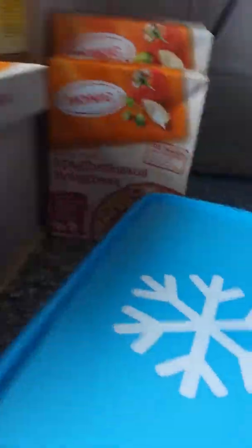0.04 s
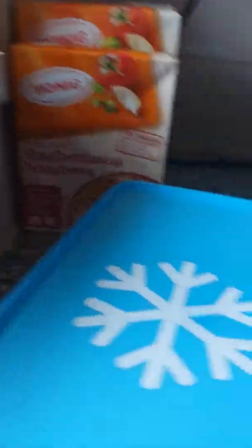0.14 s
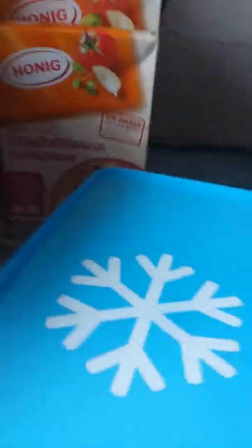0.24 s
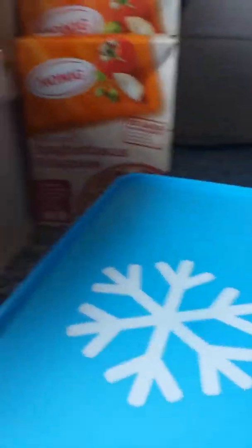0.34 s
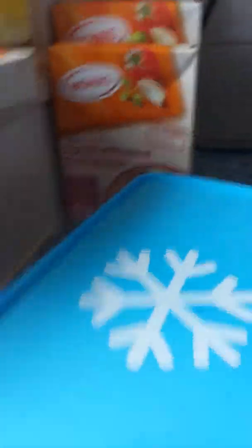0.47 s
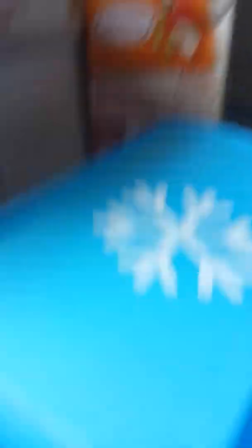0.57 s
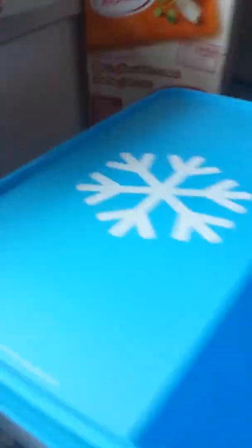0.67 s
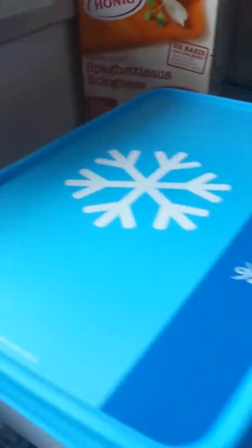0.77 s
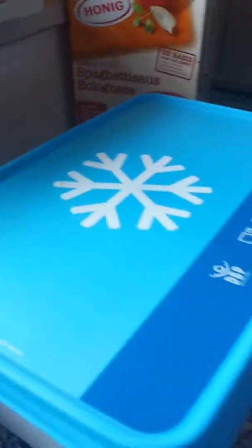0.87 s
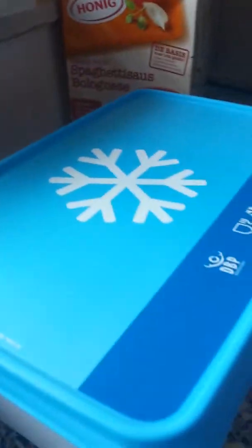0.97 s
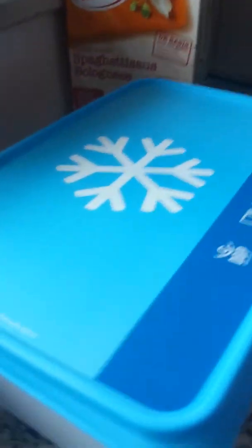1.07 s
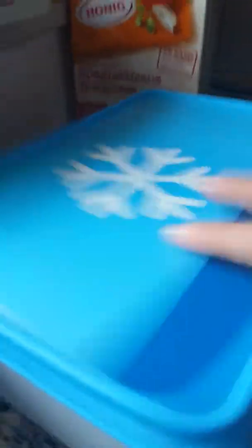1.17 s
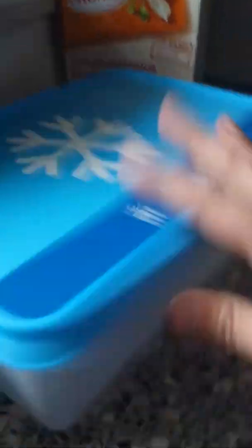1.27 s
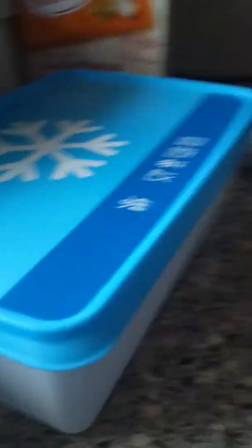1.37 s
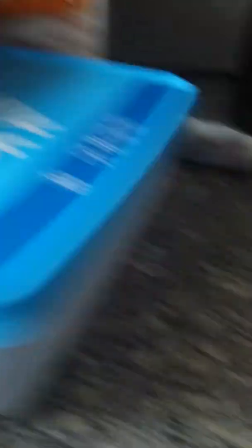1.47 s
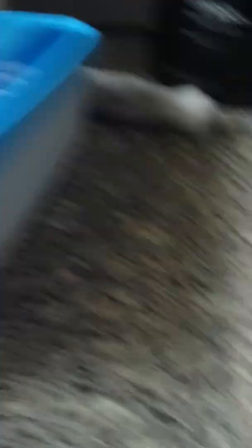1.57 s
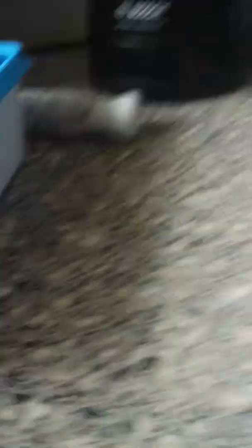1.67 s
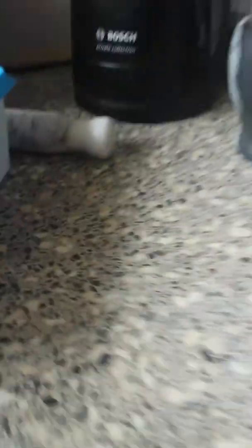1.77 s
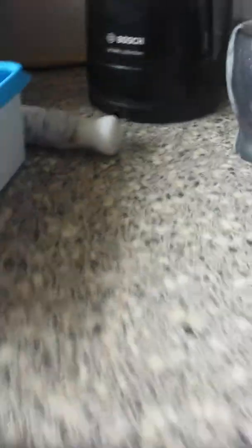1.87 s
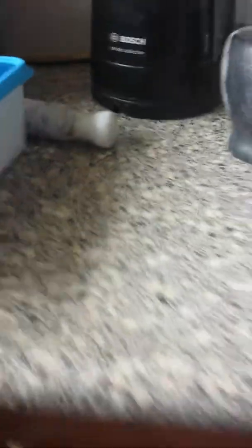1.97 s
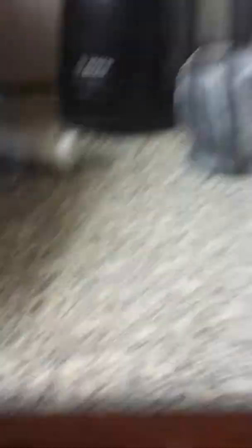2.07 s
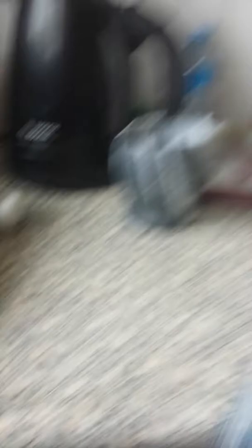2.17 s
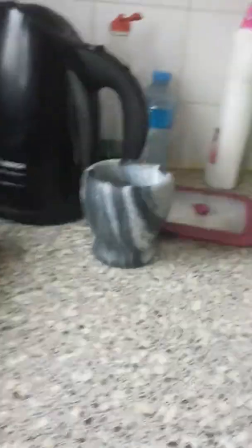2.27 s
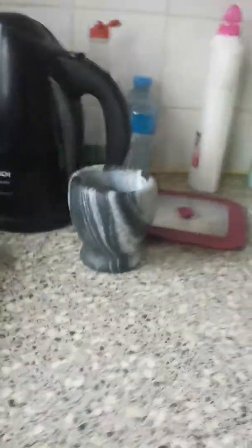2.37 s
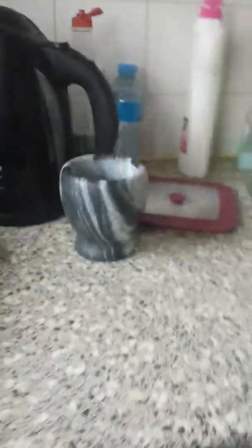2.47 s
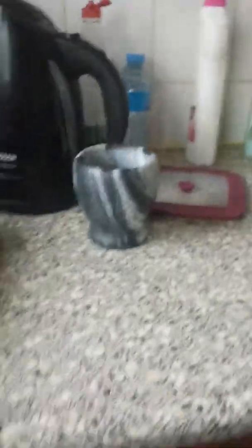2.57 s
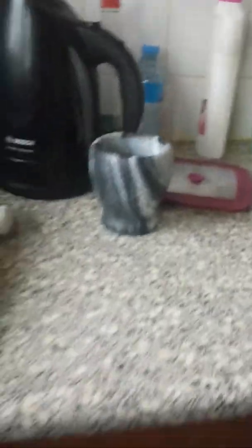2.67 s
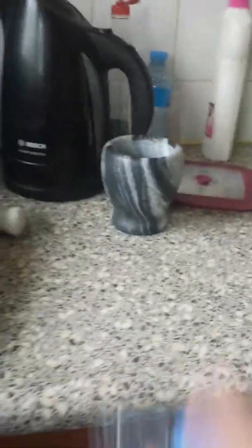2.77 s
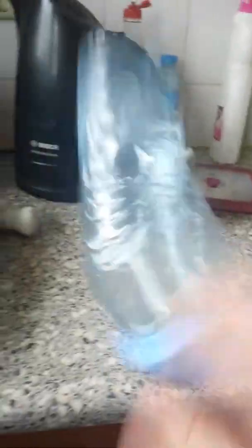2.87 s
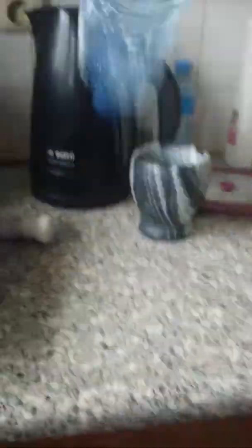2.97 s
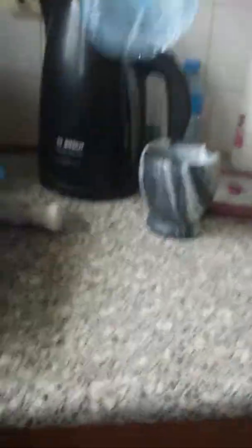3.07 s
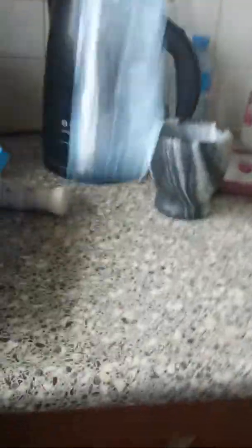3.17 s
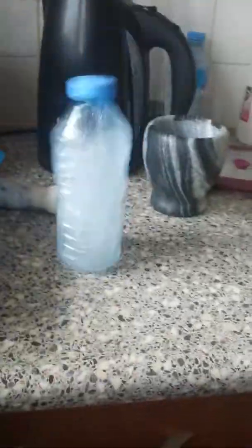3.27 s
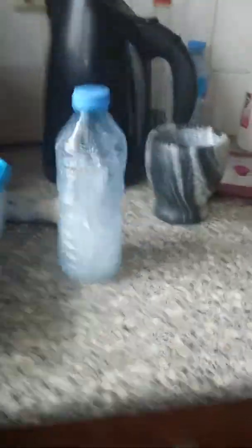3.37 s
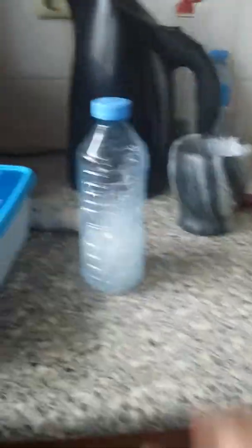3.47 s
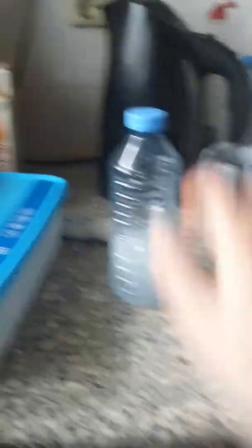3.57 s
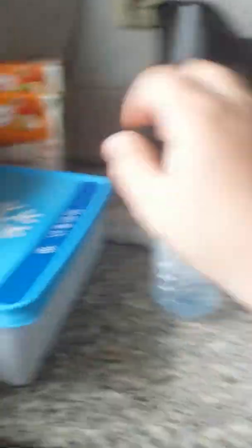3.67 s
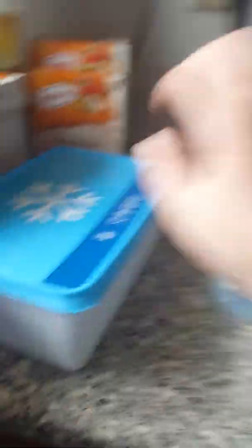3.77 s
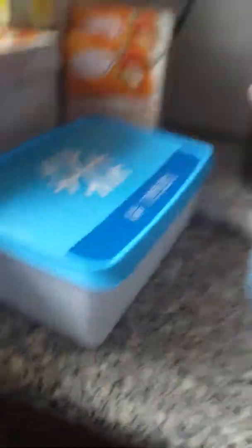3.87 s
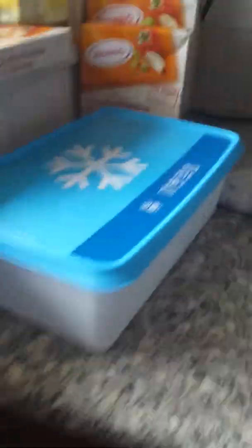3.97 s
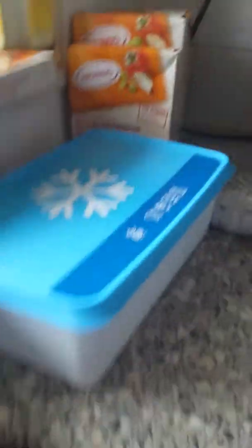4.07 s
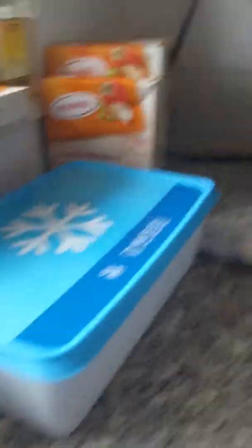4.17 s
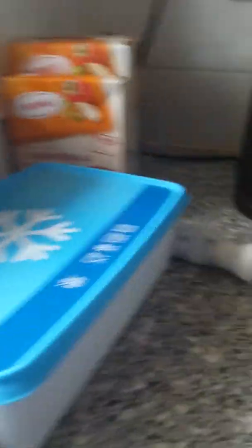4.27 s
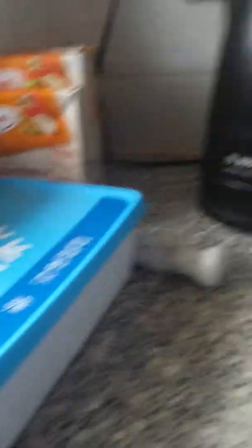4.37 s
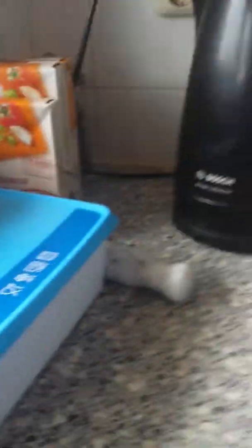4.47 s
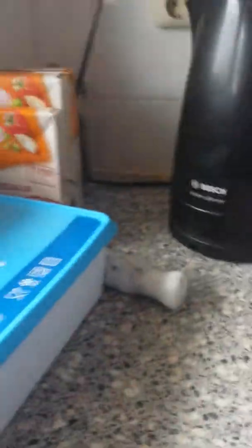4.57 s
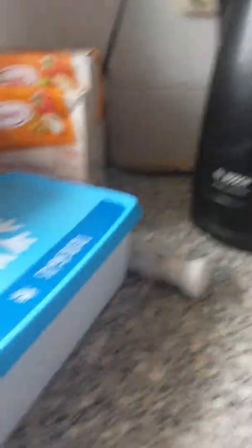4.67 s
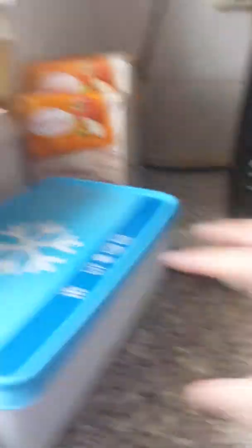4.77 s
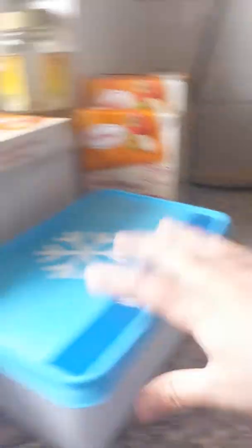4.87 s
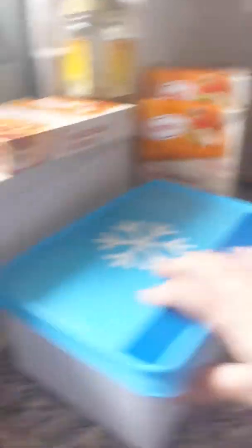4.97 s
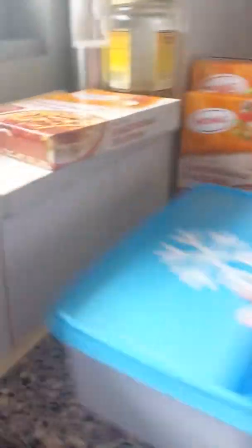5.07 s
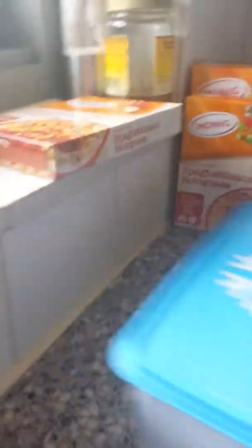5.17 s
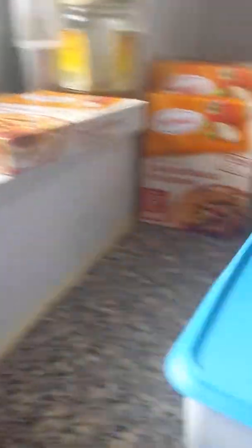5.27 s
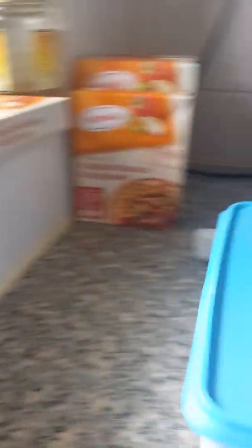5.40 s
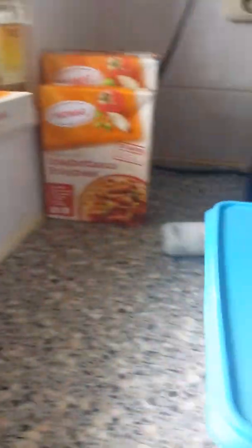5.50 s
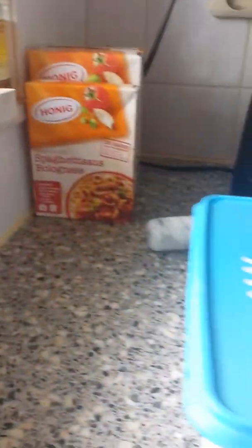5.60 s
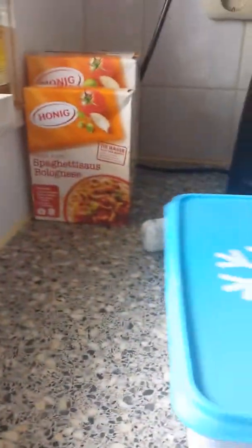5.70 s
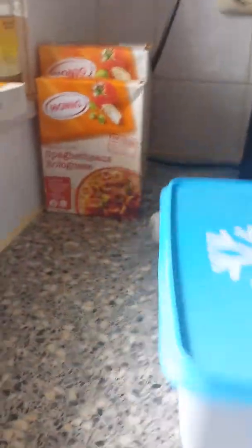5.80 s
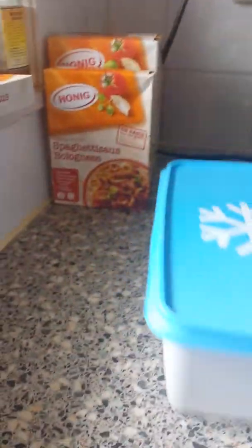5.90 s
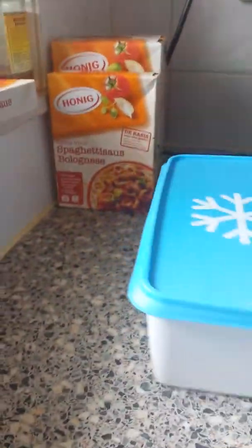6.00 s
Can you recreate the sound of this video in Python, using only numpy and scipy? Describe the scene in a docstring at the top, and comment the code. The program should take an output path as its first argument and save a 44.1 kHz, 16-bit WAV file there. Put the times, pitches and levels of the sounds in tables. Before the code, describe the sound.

A light object rings briefly, then a lidded plastic box scrapes, drums and knocks across a stone kitchen counter. Sleeves rustle close by. A part-filled plastic bottle crackles in the hand, sloshes through the air and lands with a sharp smack. The box is then shoved again, ending in a loud knock. Everything is close to a hand-held phone's microphones, with a short ring from the tiled room.

```python
"""A lidded plastic box is shoved about on a stone kitchen counter: it scrapes, drums and knocks.
Between shoves a part-filled plastic bottle is flipped: it crackles in the hand, sloshes in the air
and lands upright with a smack. Heard close up on the two microphones of a hand-held phone, with
sleeves rustling right beside them and the tiled room ringing briefly behind. At the start a light
object rings out and the phone's case creaks faintly in the grip."""
import sys
import numpy as np
from scipy import signal
from scipy.fft import rfft, irfft, next_fast_len
from scipy.io import wavfile
from scipy.ndimage import uniform_filter1d, map_coordinates

SR = 44100
rng = np.random.default_rng(int(sys.argv[2]) if len(sys.argv) > 2 else 0)


def unload_audio(sound):
    """Save the sound as a 16-bit wav file, at the path given as the first command line argument."""
    columns = np.transpose(np.atleast_2d(sound))
    # keep every value between -1 and 1, then stretch to whole-number steps
    steps = np.round(np.clip(columns, -1, 1) * 32767)
    wavfile.write(sys.argv[1], SR, steps.astype(np.int16))


N = 266364
TIME = np.arange(N) / SR
RING_TIME = TIME[:SR // 2]

# Levels in the tables are relative: each source's function adds its own trim.
# fingers squeezing the phone's case (start [s], end [s])
SQUEEZES = [(.22, 0.347), (.45, .62)]
# thin plastic buckling, and a scuff at 1.56 s (time [s], level [dB], centre [Hz], t60 [s])
BUCKLES = [(0.249, -50.5, 4450, 0.016), (1.162, -41.5, 4440, 0.15), (1.351, -16, 7080, 0.056),
           (1.56, -40.5, 5300, 0.13), (1.606, -31.5, 3820, 0.013), (2.212, -43.5, 6200, 0.022),
           (2.409, -34.5, 5200, 0.018), (2.878, -49.5, 6000, 0.063), (2.939, -17.5, 6950, 0.031),
           (3.137, -26.5, 5520, 0.039), (3.177, -32.5, 6600, 0.039), (3.517, -38, 6040, .02),
           (3.955, -50, 5860, .045), (4.0172, -30.5, 4500, 0.046), (4.032, -33.5, 7000, 0.15),
           (4.105, -18, 5980, 0.017), (4.322, -46, 6400, 0.057)]
# sleeve and hand passing the microphones (start [s], loudest [s], end [s], swish [dB], rub [dB])
ARM_STROKES = [(0.45, 0.704, 1.9, -57, -67.5), (1.529, 1.626, 1.83, -37.5, -45),
               (1.756, 1.813, 1.895, -39.5, -42), (1.79, 1.953, 2.152, -43.5, -51),
               (2.01, 2.373, 2.683, -48, -54), (3.587, 3.748, 3.9, -51.5, -60),
               (3.84, 4.085, 4.2, -52.5, -57.5), (4.364, 4.48, 4.6, -46.5, -54.5),
               (4.52, 4.666, 5, -58, -64.5), (4.85, 4.975, 5.5, -41, -55.5)]
# box against counter, at 1.608 s against a stone pestle; the sharp blow at 4.105 s is a click from the hand at
# the bottle (time [s], wall pitch [Hz], base [dB], walls [dB], contact [dB], rim share [0-1])
BOX_KNOCKS = [(0.609, 264, -39, -44.5, -70, 0), (1.238, 318, -26, -26, -26, 0.4),
              (1.308, 322, -42, -19.5, -29, 0.8), (1.348, 266, -22, -20.5, -22.5, 0),
              (1.395, 296, -22.5, -25.5, -52, .3), (1.608, 344, -29.5, -21.5, -22, 1),
              (1.635, 302, -34.5, -26.5, -34, 0.8), (1.78, 342, -67.5, -38.5, -62, .4),
              (1.923, 328, -35.5, -39.5, -42, 0.65), (2.415, 330, -29.5, -33.5, -47, .02),
              (4.046, 404, -39.5, -36.5, -37.5, 0), (4.105, 291, -69, -46, -31, 0.44),
              (4.403, 453, -47, -38.5, -41.5, 0), (4.502, 463, -47, -43, -36.5, 0),
              (4.549, 256, -36, -43, -57, .1), (4.97, 363, -22.5, -19.5, -31, 0.23),
              (5.256, 302, -18, -35, -27, .3), (5.302, 372, -45, -35, -29, .5),
              (5.336, 250, -15, -17.5, -25, 0.14), (5.361, 333, -17, -18.5, -37, .4),
              (5.601, 464, -24.5, -21, -38, 0.13), (5.933, 340, -10, -11, -25.5, 0.02)]
# box sliding (start [s], end [s], attack [s], scrape [dB], drumming [dB], judder [dB], wall pitch [Hz])
BOX_SHOVES = [(0.67, 1.072, 0.3, -33, -36.5, -26.5, 520), (1.2, 1.367, .05, -24.5, -24, -33, 314),
              (1.346, 1.513, 0.025, -50, -33, -35, 296), (4.956, 5.1, 0.022, -42, -31, -46, 360.3),
              (5.03, 5.391, .14, -26.5, -26, -34, 358), (5.4, 5.635, .09, -30, -26, -30.5, 385),
              (5.576, 6.12, 0.22, -35, -24.5, -23, 340)]
# fingertips on the lid, then the box's foot on stone
# (start [s], end [s], slip rate [1/s], level [dB], pitch [Hz])
STICK_SLIPS = [(1.163, 1.211, 210, -42.5, 4240), (4.88, 4.98, 140, -43.5, 4400),
               (5.597, 5.608, 140, -26.5, 660), (5.626, 5.679, 130, -40, 770)]
# water tumbling in the bottle (time [s], spray [dB], gurgle [dB])
SLOSH_LEVELS = [(2.885, -45, -75), (2.985, -48.5, -64), (3.015, -30, -57), (3.06, -38, -54.5),
                (3.31, -50, -50)]
# the bottle's grip, flick, water slap, landing and water slamming down
# (time [s], body [dB], contact [dB], rib share [0-1])
FLIP_BLOWS = [(2.903, -36, -40, 0.25), (2.9367, -28, -39, 0), (3.207, -37.5, -44, .02),
              (3.3151, -14.5, -12.5, 0.39), (3.325, -14, -18.5, 0.82)]

# modes of the light object, the box and the bottle (frequency [Hz], level [dB], t60 [s])
LIGHT_OBJECT_MODES = [(270, -10, 0.71), (1077, 4, 0.39), (1130, 3.5, 0.29), (2590, -4, 0.36),
                      (2780, -1, 0.24), (5690, -7, 0.63)]
BOX_SHELL_MODES = [(111.1, -5, 0.38), (129.7, 0.5, 0.22), (159.6, -2.5, 0.22), (187.3, -1, 0.26),
                   (224.7, -0.5, 0.13), (263.3, -5, 0.12), (288.3, -7, 0.39), (332.4, 0.5, 0.17),
                   (390.4, -3, 0.12), (439.8, -6.5, 0.25), (455, -4, 0.13), (567, -13.5, 0.4),
                   (671.4, -12, 0.36), (862, -14, 0.67), (970, -15, 0.15)]
BOTTLE_BODY_MODES = [(112, 1, .25), (160, 1, .1), (213, -5, .2), (254, -9, .12), (284, -3, .15),
                     (336, -3, .16), (455, -10, .17), (573, -11, .18), (697, -15, .18), (985, -14, .2),
                     (1688, -18, .17), (2635, -18, .17)]

# spectra of the sources (frequency [Hz], level [dB])
CLACK_SPECTRUM = [(200, -30.5), (500, -6.5), (950, -3.5), (1400, -8.5), (2100, -8), (3000, -13),
                  (8000, -52)]  # flat plastic struck
SNAP_SPECTRUM = [(1200, -29.5), (2100, -11.5), (2700, 0), (4300, 0), (5500, -8), (12000, -39)]  # a stiff edge struck
TICK_SPECTRUM = [(1500, -43), (3500, -14), (5000, -4), (6900, 1), (8200, -1.5), (10000, -5.5),
                 (15000, -16.5)]  # the bright top of a blow
RASP_SPECTRUM = [(150, -2.5), (450, 4.5), (700, 1.5), (900, 8), (1300, 0), (2000, -4.5), (3000, -8),
                 (5000, -27), (12000, -47.5)]  # coarse stone, folds of cloth
GRIT_SPECTRUM = [(900, -27), (2200, -3.5), (3500, -5.5), (5200, -2.5), (6900, -3.5), (8200, -5),
                 (10000, -8), (15000, -12.5)]  # fine grit, cloth fibres
HAND_SPECTRUM = [(30, -40.5), (70, -4.5), (120, -3), (200, -8), (330, -9.5), (500, -10.5), (1000, -29.5),
                 (4000, -55.5)]  # handling rumble
ROOM_TONE_SPECTRUM = [(30, 3), (120, -0.5), (300, -6.5), (700, -11.5), (1500, -11), (4000, -13),
                      (7000, -10), (10000, -13), (15000, -16)]  # the kitchen's steady hush
RATTLE_SPECTRUM = [(100, -5.5), (400, 0.5), (700, -3), (1100, 2.5), (1800, -8.5), (2800, -2),
                   (4200, -10.5), (6000, -7), (12000, -22)]
CASE_SPECTRUM = [(500, -15.5), (1300, 1.5), (2500, 4), (3500, -15), (5000, -0.5), (8000, -13),
                 (12000, -18)]
SPRAY_SPECTRUM = [(500, -9), (1700, -16), (2800, -9), (5000, -7.5), (6900, -4.5), (9000, -8.5),
                  (15000, -13.5)]

# decay of the tiled kitchen (frequency [Hz], t60 [s])
KITCHEN_T60 = [(100, 0.46), (500, 0.31), (2000, 0.4251), (7000, 0.27), (15000, 0.4)]
# strength of its reflections (frequency [Hz], level [dB])
KITCHEN_SPECTRUM = [(80, -10.5), (300, -9), (700, -4), (2000, -5.5), (7000, -6), (15000, -8)]
# response of the phone's two microphones (frequency [Hz], gain [dB])
LEFT_MIC = [(20, -30.5), (45, -0.5), (70, -19.5), (100, -4), (300, 0.47), (1000, -2), (4500, -1), (6300, 1),
            (8000, -11), (14000, -13), (16000, -11.5)]
RIGHT_MIC = [(20, -38.5), (45, -8.5), (70, 3), (100, -1.5), (300, 2), (1000, -1.34), (4500, -0.36),
             (7000, 3), (9000, -5), (14000, -4.5), (16000, -12.5)]


def amp(db):
    """Decibels to gain."""
    return 10 ** (np.asarray(db) / 20)


def unit(x, size=None):
    """Scale to rms 1, over the first size samples if given."""
    return x / np.sqrt(np.mean(x[..., :size] ** 2) + 1e-18)


def struck(x, db):
    """Set the level of the first 20 ms of a blow."""
    return amp(db) * unit(x, size=SR // 50)


def at_hz(points, hz):
    """Read (frequency, value) points on a log-frequency axis."""
    frequencies, values = np.transpose(points)
    return np.interp(np.log(np.maximum(hz, 1)), np.log(frequencies), values)


def convolve(x, response):
    """Pass x through a response, keeping its length."""
    size = next_fast_len(x.shape[-1] + len(response))
    return irfft(rfft(x, size) * rfft(response, size), size)[..., :x.shape[-1]]


def colour(x, spectrum, size=2048):
    """Minimum-phase filter with the given spectrum."""
    gain = amp(at_hz(spectrum, np.fft.rfftfreq(size, 1 / SR)))
    cepstrum = irfft(np.log(gain))
    cepstrum[1:size // 2] *= 2
    cepstrum[size // 2 + 1:] = 0
    return convolve(x, irfft(np.exp(rfft(cepstrum))))


def varispeed(x, speed):
    """Run through x at a changing speed, bending its pitch."""
    return map_coordinates(x, [np.cumsum(speed)], order=1, mode="mirror")


def add(track, time, sound):
    """Mix a sound into a two-channel track at a time in seconds."""
    i = max(int(time * SR), 0)
    track[:, i:i + sound.shape[-1]] += sound[..., :N - i]


def walk(rate):
    """Random wander with a spread near 1 and rate turns a second."""
    return np.interp(TIME * rate, np.arange(4096), rng.standard_normal(4096))


def swell(start, end, attack_s, release_s):
    """Speed of a hand movement, 0-1: it eases in and eases out."""
    rise = np.clip((TIME - start) / attack_s, 0, 1)
    fall = np.clip((end - TIME) / release_s, 0, 1)
    return (np.sin(np.pi / 2 * rise) * np.sin(np.pi / 2 * fall)) ** 2


def decay(t60):
    """Envelope that falls 60 dB in t60 seconds."""
    return np.exp(-np.log(1000) * RING_TIME / t60)


def radiated(size, shared=0.15):
    """Noise from a thin shell close by: the two microphones share only part of it."""
    both, *own = rng.standard_normal((3, size))
    return np.sqrt(shared) * both + np.sqrt(1 - shared) * np.array(own)


def grains(rate, spread_db):
    """Tiny random impacts of uneven size, about rate a second, at both microphones."""
    impacts = (rng.random(N) < rate / SR) * radiated(N)
    return impacts * amp(spread_db * np.minimum(rng.exponential(size=N), 4))


def burst(t60):
    """Countless high shell modes dying together."""
    return radiated(len(RING_TIME)) * decay(t60)


def ring(modes, detune=0.008, rise_cycles=0.075):
    """Decaying modes, one a row, that swell within a cycle; grip and contact shift them a little."""
    hz, db, t60 = np.transpose(modes)[:, :, None]
    hz = hz * (1 + detune * rng.standard_normal(hz.shape))
    envelope = (1 - np.exp(-hz * RING_TIME / rise_cycles)) * decay(t60)
    return amp(db) * envelope * np.sin(2 * np.pi * (hz * RING_TIME + rng.random(hz.shape)))


def light_tap():
    """A light object, just tapped, rings out with a faint rattle."""
    out = np.zeros((2, N))
    rattle = colour(burst(t60=0.38), RATTLE_SPECTRUM)
    tone = ring(LIGHT_OBJECT_MODES).sum(0)
    add(out, 0, struck(tone, db=-42.5) + struck(rattle, db=-37.5))
    return out


def grip_ticks(rate=70, level_db=-62.5):
    """Right at the microphones, the phone's case gives under the fingers in tiny, uneven ticks."""
    slip_count = np.cumsum(rate * amp(0.92 * walk(35))) / SR
    slips = np.diff(np.floor(slip_count), prepend=0)
    ticks = colour(slips * amp(2 * walk(51.1)) * radiated(N), CASE_SPECTRUM)
    squeeze = sum(swell(start, end, attack_s=0.022, release_s=0.023) for start, end in SQUEEZES)
    return amp(level_db) * squeeze * unit(ticks)


def plastic_clicks():
    """Thin plastic buckles, or a scuff, with a short snap around one pitch."""
    out = np.zeros((2, N))
    for time, db, hz, t60 in BUCKLES:
        spectrum = [(200, -22), (hz / 3, -17), (hz, -8), (hz, 0), (hz * np.sqrt(2), -11), (hz * 2, -17)]
        snap = colour(burst(t60), spectrum)
        add(out, time, amp(db) * unit(snap, size=SR // 300))
    return out


def sleeve_rustle(trim_db=-1, speed_power=0.71):
    """Beside the microphones cloth fibres catch and let go, and the hand rumbles, as the arm moves."""
    swish, rub = sum(amp(levels_db)[:, None] * swell(start, end, peak - start, end - peak) ** speed_power
                     for start, peak, end, *levels_db in ARM_STROKES)
    fibres = swish * unit(colour(grains(rate=11000, spread_db=3), GRIT_SPECTRUM))
    folds = rub * unit(colour(grains(rate=2100, spread_db=4.5), RASP_SPECTRUM))
    hand = rub * unit(colour(grains(rate=1200, spread_db=-0.5).mean(0), HAND_SPECTRUM))
    flutter = amp(1.1 * walk(35))
    return amp(trim_db) * (flutter * (fibres + folds) + hand)


def base_and_walls(pitch_hz, focus_db=14, split_hz=250):
    """The box's base carries the low modes; the point of contact favours wall modes near one pitch."""
    hz = np.array(BOX_SHELL_MODES)[:, 0]
    modes = ring(BOX_SHELL_MODES, detune=0.011)
    low = hz < split_hz
    favour = amp(-focus_db * abs(np.log2(hz / pitch_hz)))
    return modes[low].sum(0), favour[~low] @ modes[~low]


def contact_levels(db, stiff_share, even_db, brighten):
    """Flat plastic clacks, stiff edges snap, and blows above even_db tick ever more brightly."""
    share = np.clip(stiff_share, 0.001, 0.999)
    clack_db = db + 10 * np.log10(1 - share)
    snap_db = db + 10 * np.log10(share)
    tick_db = db + brighten * (db - even_db)
    return clack_db, snap_db, tick_db


def crack(levels_db, t60, rattle_db, rattle_t60):
    """Struck plastic gives a clack, a snap and a tick, then the shell rattles out."""
    out = 0
    for spectrum, db in zip((CLACK_SPECTRUM, SNAP_SPECTRUM, TICK_SPECTRUM), levels_db):
        shell = burst(t60) + amp(rattle_db) * burst(rattle_t60)
        out += struck(colour(shell, spectrum), db)
    return out


def box_knocks(trim_db=-3):
    """Each knock rings the box's base and walls and cracks at the contact."""
    out = np.zeros((2, N))
    for time, pitch_hz, base_db, wall_db, contact_db, rim_share in BOX_KNOCKS:
        base, walls = base_and_walls(pitch_hz)
        add(out, time, struck(base, base_db) + struck(walls, wall_db))
        levels_db = contact_levels(contact_db, rim_share, even_db=-28, brighten=0.44)
        add(out, time, crack(levels_db, t60=0.073, rattle_db=-15.5, rattle_t60=0.46))
    return amp(trim_db) * out


def box_drumming(wall_gain, base_gain, pitch_hz, slip_rate=1300, flex=0.0493):
    """Slips ring base and walls; the pushing hand flexes the walls, so their pitch wanders."""
    out = np.zeros(N)
    moving = wall_gain + base_gain > amp(-90)
    slips = (rng.random(N)[moving] < slip_rate / SR) * rng.standard_normal(N)[moving]
    base, walls = base_and_walls(pitch_hz, focus_db=13)
    flexed = varispeed(convolve(slips, walls), 1 + flex * walk(14)[moving])
    out[moving] = wall_gain[moving] * unit(flexed) + base_gain[moving] * unit(convolve(slips, base))
    return out


def stone_scrape(rasp_gain, grit_gain, brisk_db=-32, glide=0.12):
    """The stone's grain rasps under the box, higher in a brisk shove, and fine grit hisses."""
    grain = unit(grains(rate=5000, spread_db=1.5))
    coarse_specks = amp(-4) * unit(grains(rate=130, spread_db=2))
    stone = colour(grain + coarse_specks, RASP_SPECTRUM)
    speed = np.clip((rasp_gain / amp(brisk_db) + 1e-6) ** glide, 0.6, 1.03)
    rasp = amp(-2) * rasp_gain * unit(np.array([varispeed(side, speed) for side in stone]))
    hiss = amp(-4) * grit_gain * unit(colour(grains(rate=6900, spread_db=1), GRIT_SPECTRUM))
    pressure = amp(2 * walk(45))  # the foot bears down unevenly
    return pressure * (rasp + hiss)


def box_slides(drum_power=0.72, grit_power=0.9, judder_s=0.069, judder_lead_s=0.048):
    """The box catches and slips on the stone: it drums and scrapes with speed and judders as it stops."""
    drumming, rasp_gain, grit_gain = 0, 0, 0
    wall_chatter = amp(-2 + 1.5 * walk(22))
    for start, end, attack_s, scrape_db, drum_db, judder_db, pitch_hz in BOX_SHOVES:
        speed = swell(start, end, attack_s, release_s=0.13)
        drive = amp(drum_db) * speed ** drum_power
        stop = end - judder_lead_s
        judder = amp(judder_db) * swell(stop - judder_s, stop + judder_s, judder_s, judder_s)
        base_gain = amp(-13) * drive + amp(-4) * judder
        drumming += box_drumming(wall_chatter * drive, base_gain, pitch_hz)
        rasp_gain += amp(scrape_db) * speed
        grit_gain += amp(scrape_db) * speed ** grit_power
    return drumming + stone_scrape(rasp_gain, grit_gain)


def box_creaks():
    """A contact sticks and slips in a quick, nearly even train; each slip rings briefly."""
    out = np.zeros((2, N))
    for start, end, rate, db, hz in STICK_SLIPS:
        slip_count = np.cumsum(rate * (1 + 0.06 * walk(60))) / SR
        slips = np.diff(np.floor(slip_count), prepend=-1)[:int((end - start) * SR)]
        chirp = ring([(hz, 0, 45 / hz), (hz * 1.233, -2, 32 / hz)]).sum(0)
        add(out, start, amp(db) * unit(convolve(slips, chirp)))
    return out


def water_slosh(bubble_count=160, bubble_t60=0.018):
    """Spray patters on the spinning bottle's wall; a crowd of short bubbles gurgles."""
    times, *columns = np.transpose(SLOSH_LEVELS)
    gains = [amp(np.interp(TIME, times, db, left=-np.inf, right=-np.inf)) for db in columns]
    spray, gurgle = uniform_filter1d(np.array(gains), size=400, axis=1)
    bubbles = np.zeros((2, N))
    for when, octaves in rng.random((bubble_count, 2)) * [times[-1] - times[0], 2]:
        hz = 300 * 2 ** octaves
        phase = 2 * np.pi * hz * RING_TIME * (1 + 2 * RING_TIME)  # rising as it nears the surface
        add(bubbles, times[0] + when, np.sin(phase) * decay(bubble_t60))
    patter = colour(grains(rate=11000, spread_db=1.5), SPRAY_SPECTRUM)
    return spray * unit(patter) + amp(3) * gurgle * bubbles


def bottle_rocking(start_s=3.339, gap_s=0.0165, level_db=-23.5, rib_share=0.6):
    """Three equal blows of the bottle's foot as it rocks after landing."""
    return [(start_s + k * gap_s, level_db, level_db, rib_share) for k in range(3)]


def bottle_blows(body_trim_db=-1, crack_trim_db=-2):
    """The water-laden body thumps while its thin ribbed shell crackles."""
    out = np.zeros((2, N))
    for time, body_db, contact_db, rib_share in FLIP_BLOWS + bottle_rocking():
        add(out, time, struck(ring(BOTTLE_BODY_MODES).sum(0), body_db + body_trim_db))
        levels_db = contact_levels(contact_db, rib_share, even_db=-2, brighten=0.05)
        add(out, time, amp(crack_trim_db) * crack(levels_db, t60=0.12, rattle_db=-12, rattle_t60=0.19))
    return out


def diffuse_noise(size, shared_hz=550):
    """Noise from all round at two close microphones: alike in the bass, unrelated in the treble."""
    mid, side = rng.standard_normal((2, size))
    likeness = 1 / (1 + (np.fft.rfftfreq(size, 1 / SR) / shared_hz) ** 4)
    mid = irfft(rfft(mid) * np.sqrt((1 + likeness) / 2), size)
    side = irfft(rfft(side) * np.sqrt((1 - likeness) / 2), size)
    return np.array([mid + side, mid - side])


def kitchen_reverb(x, build_s=0.01, lowest_hz=125, bands=8):
    """Dense reflections from tiles and counter; each octave dies away at its own rate."""
    size = len(RING_TIME)
    hz = np.fft.rfftfreq(size, 1 / SR)
    octave = np.clip(np.log2(np.maximum(hz, 1) / lowest_hz), 0, bands - 1)
    noise = rfft(diffuse_noise(size))
    tail = 0
    for k in range(bands):
        band = irfft(noise * np.maximum(1 - abs(octave - k), 0), size)
        t60 = at_hz(KITCHEN_T60, lowest_hz * 2 ** k)
        envelope = decay(t60) * (1 - np.exp(-RING_TIME / build_s))
        tail += band * envelope / np.linalg.norm(envelope)
    return np.array([convolve(mic, colour(side, KITCHEN_SPECTRUM)) for mic, side in zip(x, tail)])


def room_tone(level_db=-60):
    """A faint, steady hush fills the kitchen."""
    return amp(level_db) * np.array([unit(colour(side, ROOM_TONE_SPECTRUM)) for side in diffuse_noise(N)])


def from_right(x, lag_s, right_db):
    """Direct sound reaches the left microphone a little later and the right one a little louder."""
    left = np.interp(TIME - np.round(lag_s * SR) / SR, TIME, x[0])
    return np.array([amp(-right_db / 2) * left, amp(right_db / 2) * x[1]])


def scene():
    """Box, bottle and hands close up and a little to the right, with the kitchen behind them."""
    knocks = box_knocks() + light_tap()
    bottle = bottle_blows() + water_slosh()
    clicks = plastic_clicks()
    rubbing = box_slides() + sleeve_rustle() + box_creaks() + grip_ticks()
    direct = (from_right(knocks, lag_s=0.00023, right_db=2)
              + from_right(bottle, lag_s=0.00007, right_db=2)
              + from_right(clicks, lag_s=0.0003, right_db=3)
              + from_right(rubbing, lag_s=0.00012, right_db=0.6))
    reflections = kitchen_reverb(amp(-2.5) * knocks + bottle + clicks + rubbing)
    return direct + reflections + room_tone()


def record(dry):
    """The phone's microphones, the left duller and quieter; peaks clip and the top is cut."""
    mics = np.array([colour(dry[0], LEFT_MIC), colour(dry[1], RIGHT_MIC)])
    top_cut = signal.ellip(8, 0.2, 70, 15400, fs=SR, output="sos")
    return signal.sosfilt(top_cut, np.clip(mics, -1, 1))


dry = scene()
out = record(dry)
unload_audio(out)
```